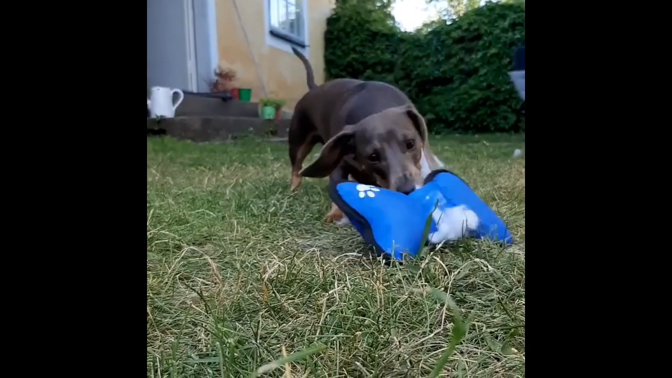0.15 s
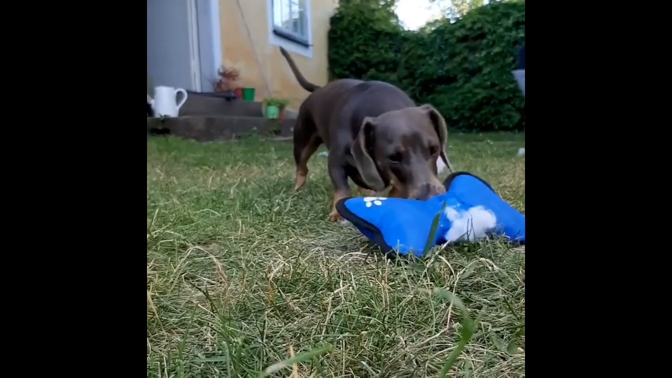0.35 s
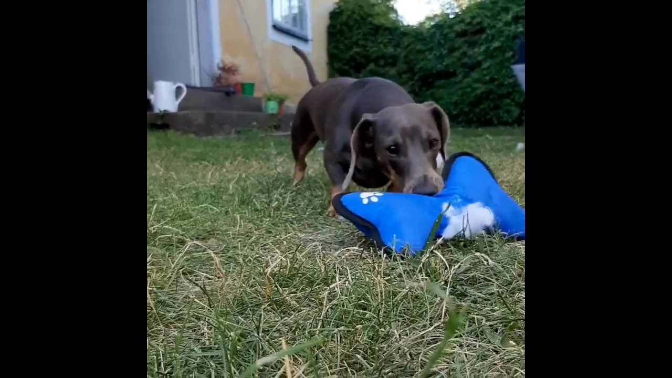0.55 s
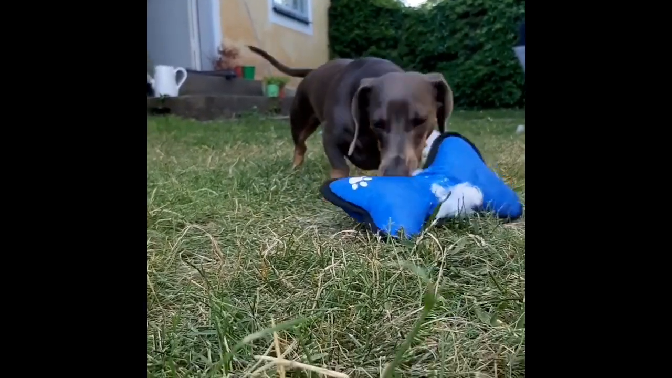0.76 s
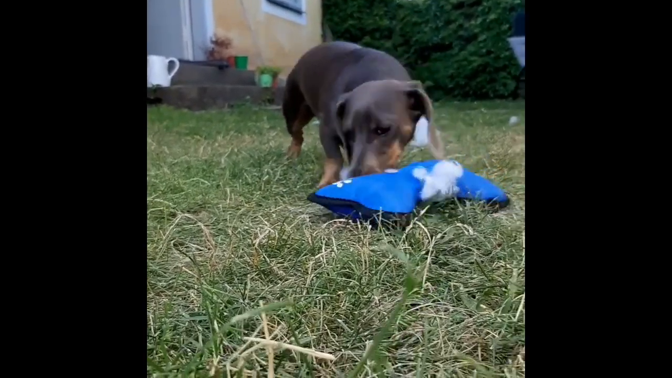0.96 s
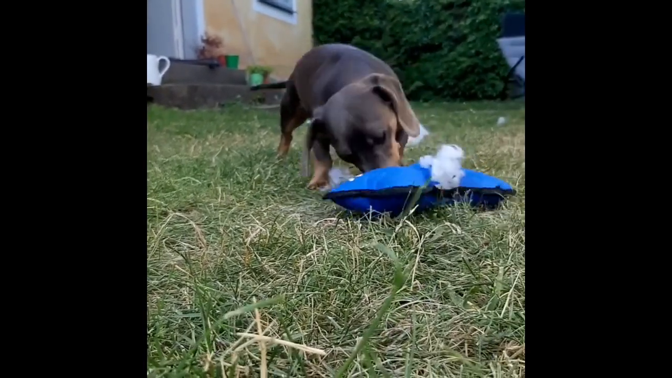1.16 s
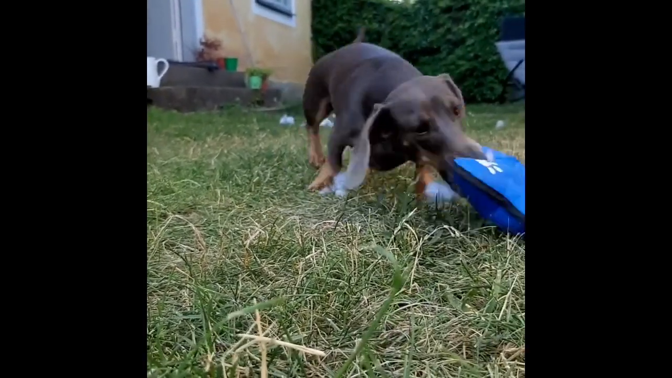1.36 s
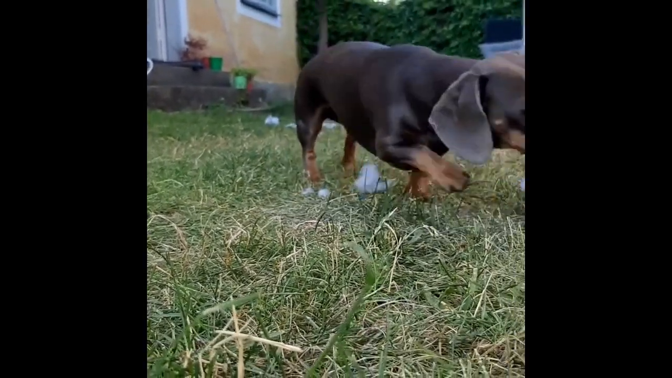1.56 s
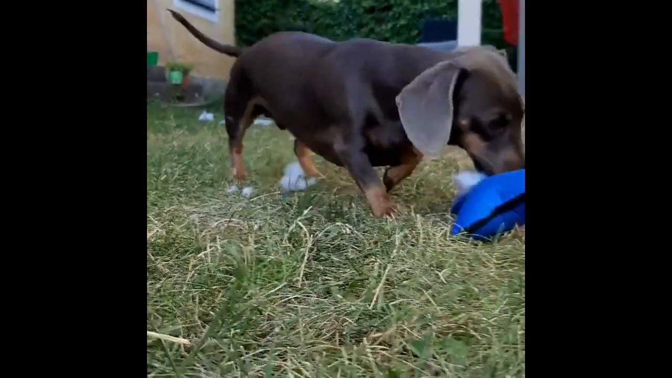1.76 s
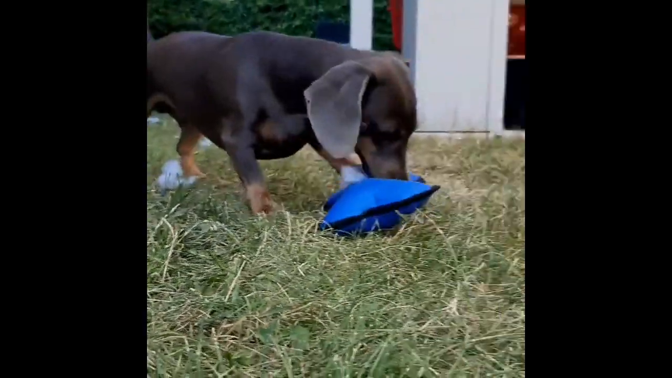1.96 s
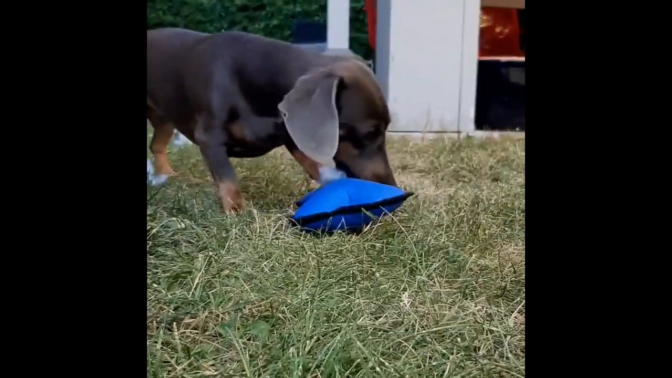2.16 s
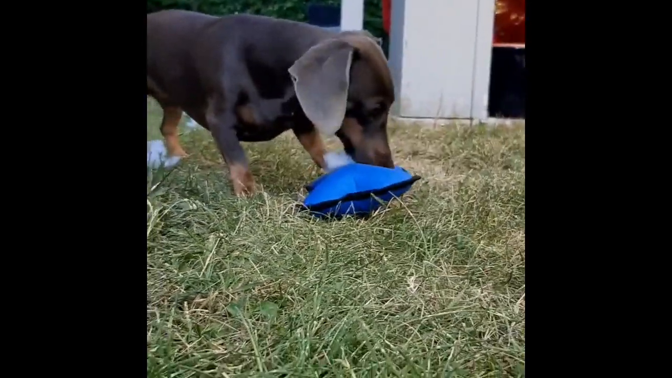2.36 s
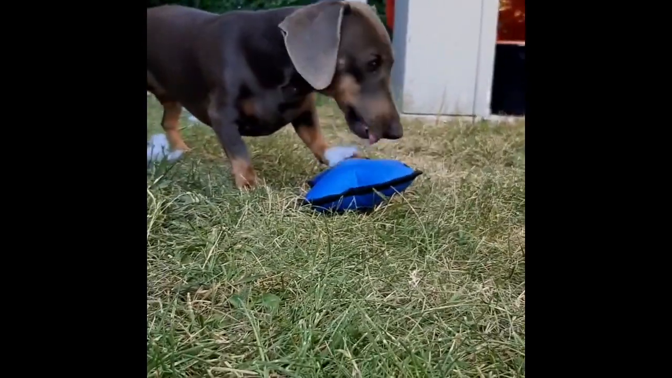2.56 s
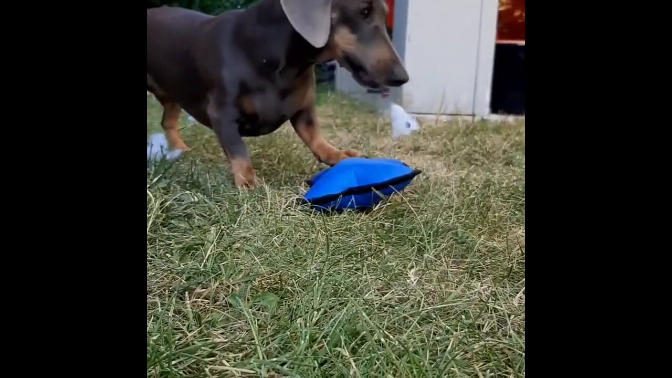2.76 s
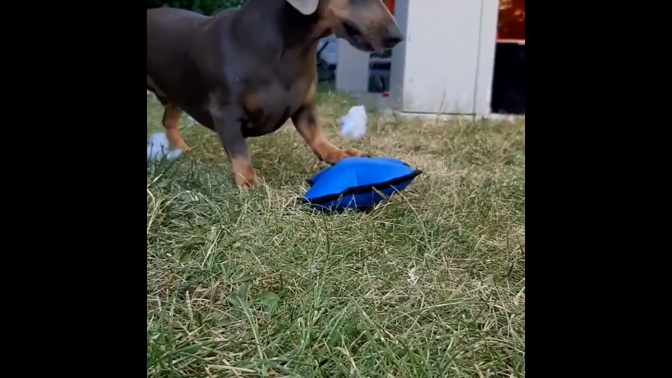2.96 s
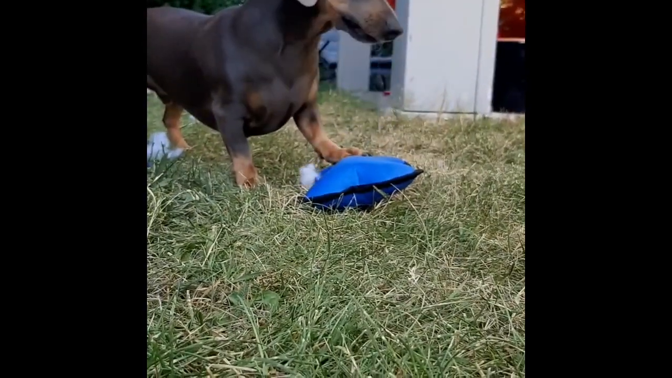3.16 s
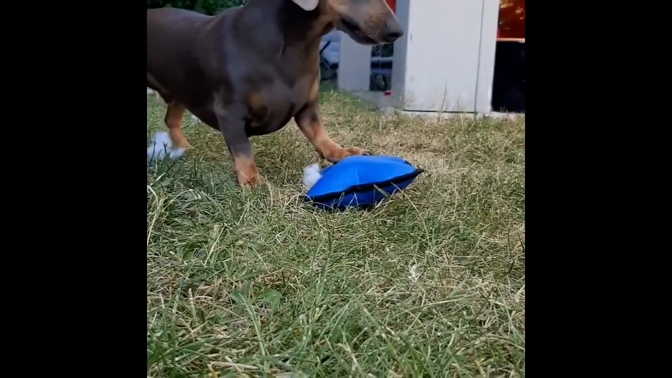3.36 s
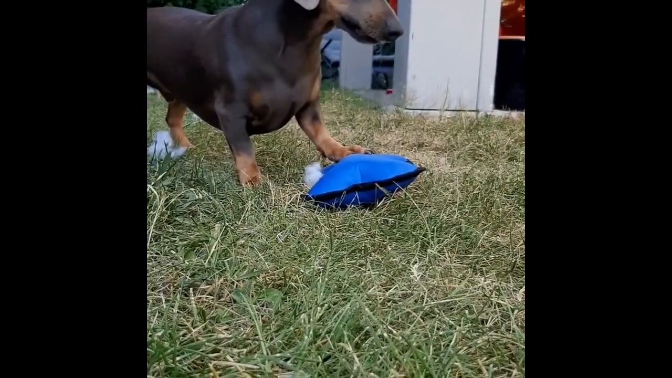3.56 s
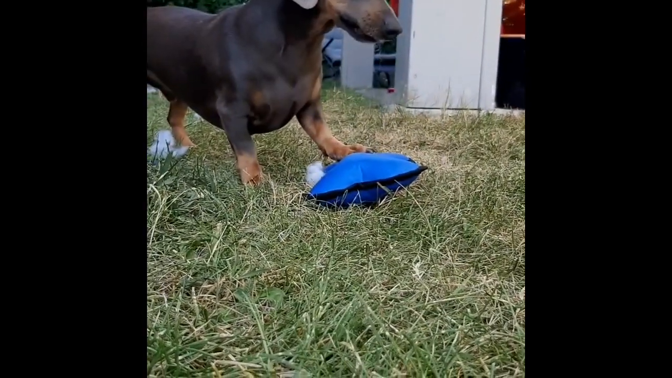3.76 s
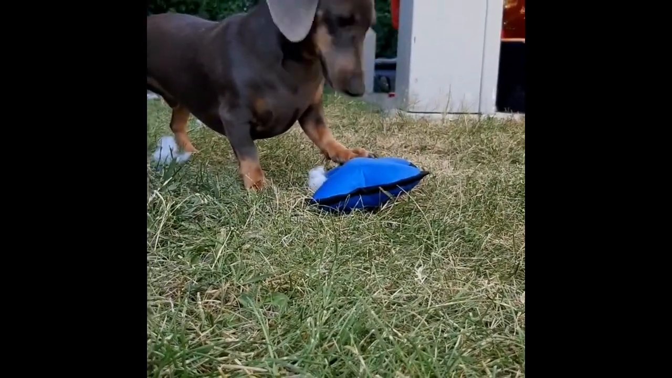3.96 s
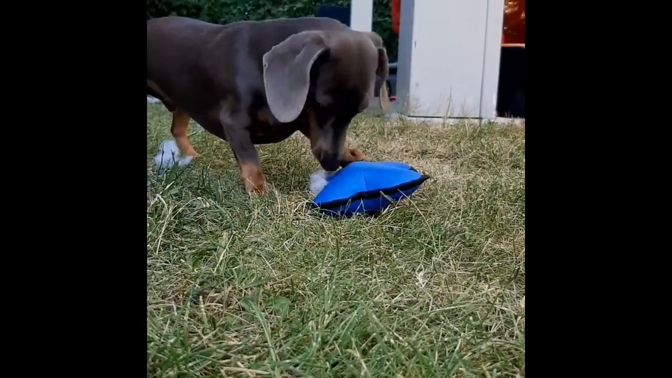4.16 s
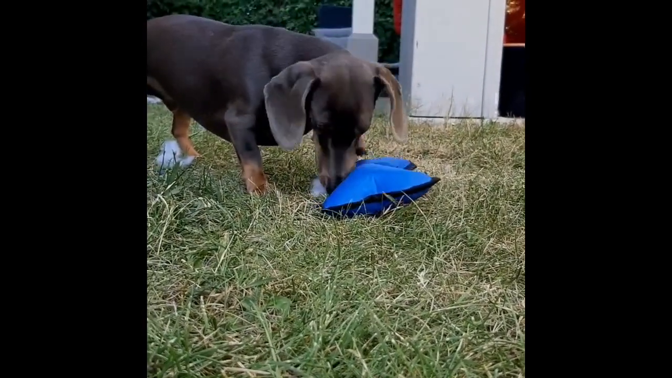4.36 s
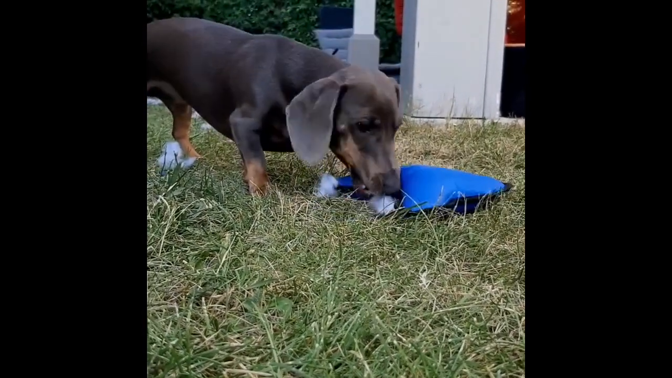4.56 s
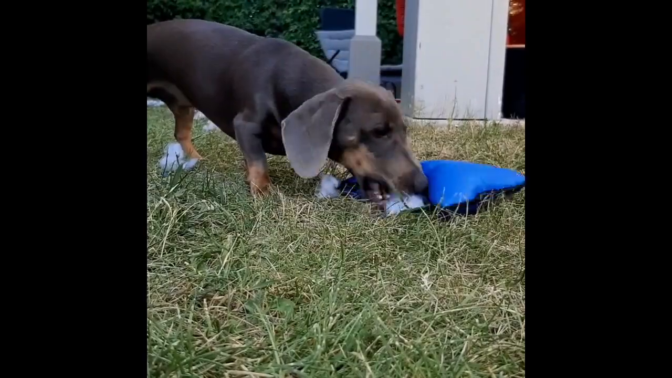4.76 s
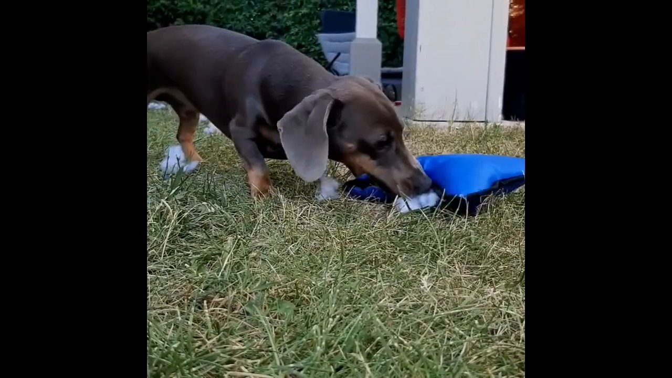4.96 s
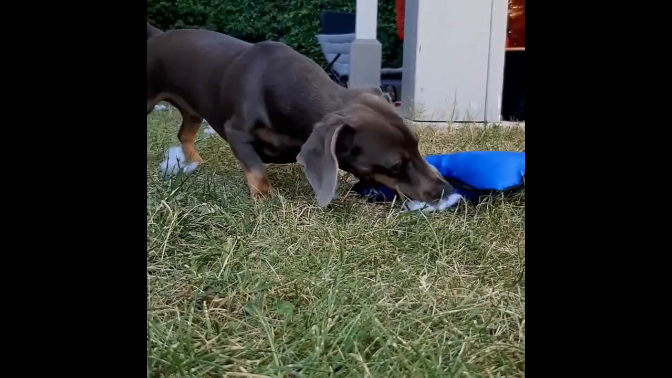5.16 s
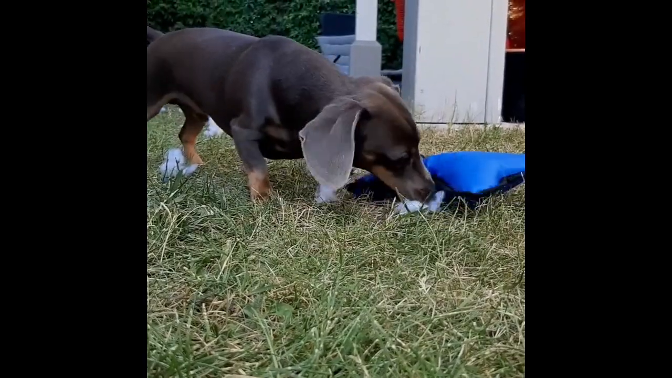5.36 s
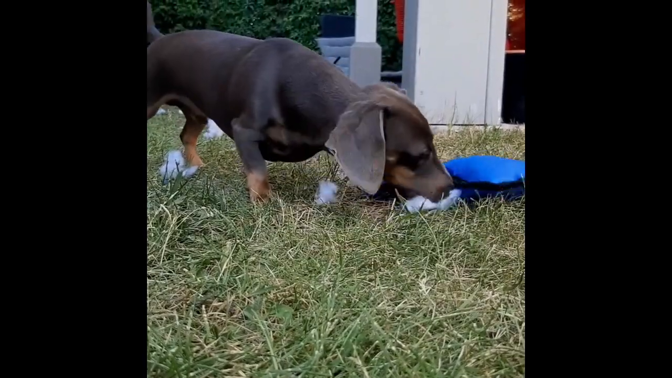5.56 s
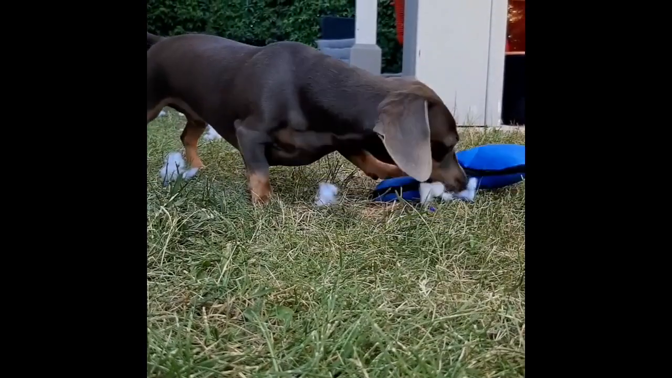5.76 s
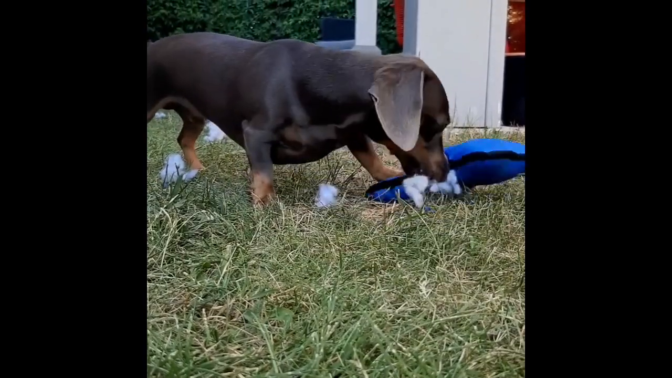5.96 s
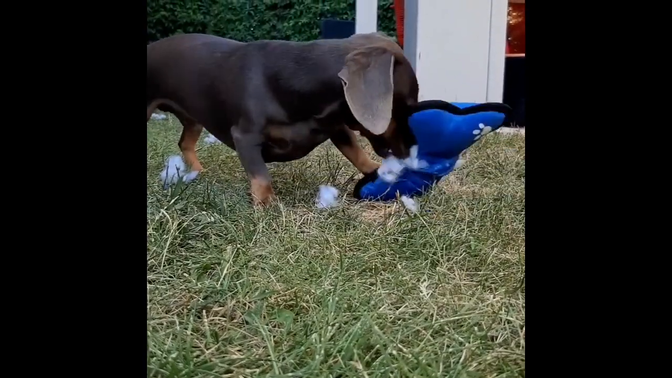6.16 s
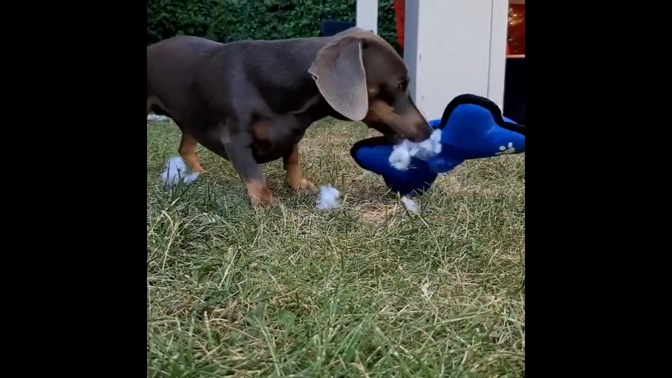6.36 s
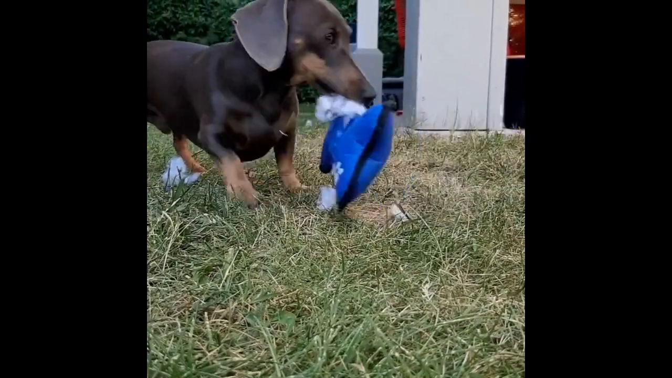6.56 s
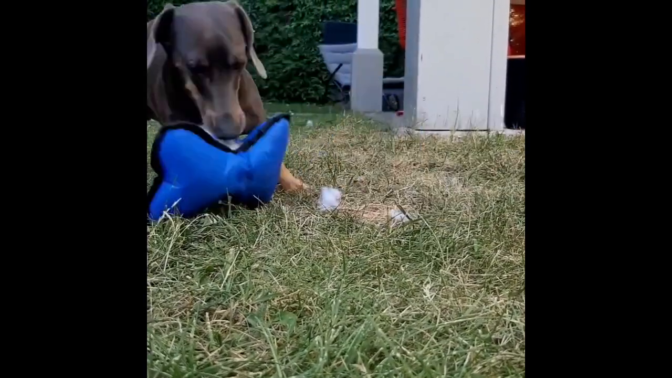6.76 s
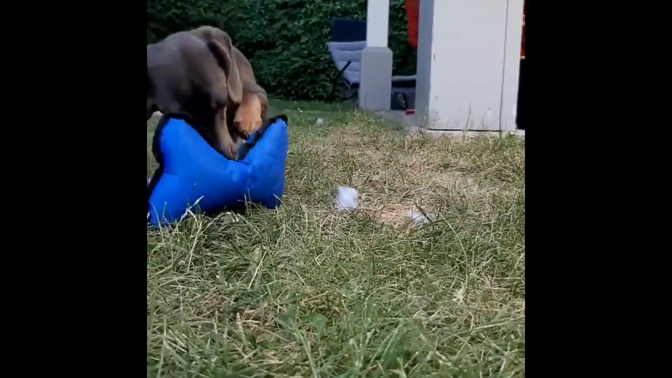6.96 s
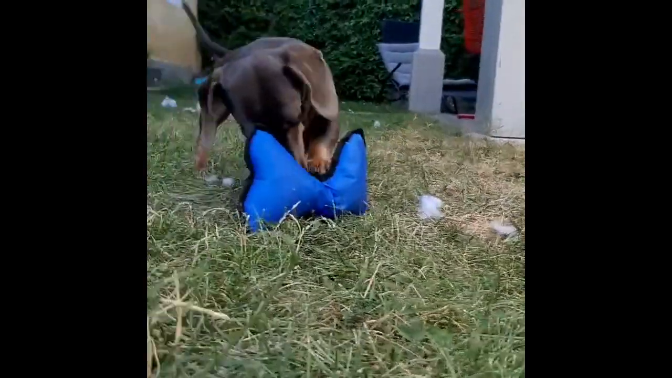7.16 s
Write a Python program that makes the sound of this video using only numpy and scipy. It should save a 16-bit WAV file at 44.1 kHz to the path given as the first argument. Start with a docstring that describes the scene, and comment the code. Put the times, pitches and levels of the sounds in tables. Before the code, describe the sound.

Stiff dry grass drags across the right microphone port, very close and bright, with crackling scrapes, sharp ticks and a few popping thumps. It is busiest for the first two and a half seconds, then nearly stops. A brief scrape returns at four seconds. Behind, faint in both ports, a small dog tugs a fabric toy with rustles, huffs and a dull knock, then a quick swish before the grass bursts back at the end.

```python
"""Stiff grass blades drag, tick and thump across the right one of two microphone ports held down in dry grass.
The drag is noise and tiny slips ringing many blades; ticks are short noise bursts; thumps are pushes of air.
Behind it, faint in both ports, a puppy worries a stuffed fabric toy: shaped noise makes its rustle and huffs,
and fading low tones make the falls of paws and toy. A quiet garden rumble of low noise lies under it all."""
import sys
import numpy as np
from scipy import signal
from scipy.fft import rfft, irfft, next_fast_len
from scipy.io import wavfile
from scipy.ndimage import uniform_filter1d

SR = 44100
rng = np.random.default_rng(int(sys.argv[2]) if len(sys.argv) > 2 else 0)


def generate_wav(sig):
    """Save sig (samples, or channels by samples) to the path in sys.argv[1] as 16-bit PCM at SR."""
    pcm = np.round(np.clip(np.atleast_2d(sig).T, -1, 1) * 32767).astype(np.int16)
    wavfile.write(sys.argv[1], SR, pcm)


N = 317961   # length in samples

# stalks pressed flat on the port: start_s, first_swing (about full scale 1, sign gives direction),
# push_ms (length of the push), step_db (lasting pressure drop)
THUMPS = [(.8730, 0.54, 0.21, -25), (0.914, -0.09, 0.38, -59), (1.617, 0.14, 0.49, -39),
          (1.7890, -0.17, 0.57, -37), (1.7992, 0.27, 0.21, -5.5), (2.3744, 0.81, 0.052, -15.5),
          (6.956, -0.11, 0.85, -49.5), (6.9949, 0.27, 0.26, -39), (7.021, 0.22, 1.08, -31),
          (7.0314, -0.45, 0.97, -43), (7.100, -0.19, 1.36, -24), (7.104, -0.071, 2.3, -43),
          (7.157, -0.17, 0.59, -24), (7.171, -0.16, 1.45, -26), (7.193, -0.049, 2, -49)]
CUTOFF_HZ = 13600   # top of the sound


def from_db(db):
    """Gain of a level in dB."""
    return 10 ** (np.asarray(db) / 20)


def rms_one(x):
    """Scale to an average (rms) level of 1."""
    return x / np.sqrt(np.mean(x ** 2) + 1e-20)


def in_time(rows):
    """Join the rows of a table with straight lines: one value a sample for each column after the time."""
    s, *columns = np.transpose(rows)
    return [np.interp(np.arange(N) / SR, s, column) for column in columns]


def smooth(x):
    """Turn a control known at every 32nd sample into one value a sample."""
    return np.interp(np.arange(N) / 32, np.arange(len(x)), x)


def drift(rate):
    """Slow random wander that turns about rate times a second; spread 1."""
    r = np.exp(-2 * np.pi * rate / SR)
    noise = rng.standard_normal(N + SR)
    return rms_one(signal.lfilter([1], [1, -2 * r, r * r], noise)[SR:])   # drop the first second: settling


def colour(x, points):
    """Shape a spectrum by (pitch, level) points, falling 13 dB an octave more outside them; rms 1."""
    size = next_fast_len(N)
    octave = np.log2(np.maximum(np.arange(size // 2 + 1) * SR / size, 1))
    pitch_hz, level_db = np.transpose(points)
    at = np.log2(pitch_hz)
    outside = np.maximum(at[0] - octave, 0) + np.maximum(octave - at[-1], 0)
    gain = from_db(np.interp(octave, at, level_db) - 13.0 * outside)
    return rms_one(irfft(rfft(x, size) * gain, size)[..., :N])


def add(out, s, sound):
    """Mix a short sound in at time s."""
    i = round(s * SR)
    out[i:i + len(sound)] += sound[:N - i]


def swells(s, level_db, rise, fall):
    """Power of each event: it climbs and drops 20 dB in its rise and fall, and ever faster beyond."""
    late = np.arange(0, N + 32, 32) / SR - s[:, None]   # seconds after the loudest moment
    away = np.where(late < 0, -late / rise[:, None], late / fall[:, None])
    drop_db = 20 * np.maximum(away, away ** 2)
    return from_db(2 * (level_db[:, None] - drop_db))   # doubled dB gives power


def two_ports(make, points, alike):
    """A source partly common to both ports (the right one hears it round the handset), partly scattered."""
    round_body_hz = 1200   # the path round the handset turns the phase by a quarter cycle here
    common, left, right = make(), make(), make()
    turn = np.tan(np.pi / 4 - np.pi * round_body_hz / SR)
    later = signal.lfilter([-turn, 1], [1, -turn], common)   # all-pass: turns phase, keeps level
    shared = np.sqrt(alike) * np.array([common, later])
    scattered = np.sqrt(1 - alike) * np.array([left, right])
    return colour(shared + scattered, points)


def garden_rumble():
    """Steady low noise, a little stronger in the right port."""
    # colour of the rumble: pitch_hz, level_db (relative)
    rumble_colour = [(25, -12.5), (60, 5.5), (130, 0.5), (190, 1.5), (300, -19.5)]
    rumble = two_ports(lambda: rng.standard_normal(N), rumble_colour, alike=0.31)
    return from_db(-82) * rumble * from_db([[0], [2.5]])


def lumpy_noise():
    """Noise of uneven strength, for cloth, grass and breath."""
    return from_db(0.52 * drift(43)) * rng.standard_normal(N)


def rustle_and_huffs():
    """The dog's tugs and steps swell a bright rustle of cloth and grass and lower breathy huffs."""
    # tugs and steps: loudest_s, rustle_db, rise_s and fall_s (times for 20 dB),
    # huff_db (huffing and shuffling over the rustle, in the left port)
    tugs = [(.17, -58, 0.28, 0.14, -11.5), (.58, -67, 0.32, 0.18, -2), (.75, -55.5, .1, 0.13, -7),
            (.97, -65.5, 0.23, .2, -2), (1.17, -66, .2, 0.34, -14), (1.39, -57, 0.17, 0.16, -9.5),
            (1.59, -65.5, 0.16, 0.17, -1), (1.77, -58, 0.21, 0.067, -4), (1.87, -63, 0.082, .2, -6),
            (1.99, -61.5, .1, .15, -5), (2.2, -65, 0.14, 0.23, 13.5), (2.3, -63.5, .2, 0.2, 7),
            (4.02, -69, .2, .25, 2), (4.21, -72, .2, .3, -1.5), (4.5, -55, .09, 0.11, -8),
            (4.77, -60.5, 0.15, 0.12, -5.5), (5.12, -67, 0.4, 0.17, -1), (5.3, -65, 0.08, 0.14, -3),
            (5.51, -61.5, 0.13, 0.07, -9.5), (5.69, -62.5, .25, 0.091, -11), (5.9, -66, 0.4, 0.15, -9),
            (6.045, -58.5, 0.032, 0.093, 0), (6.29, -64.5, 0.072, 0.14, -5), (6.45, -68, 0.072, 1, -4),
            (6.7, -42.5, .03, 0.074, -7.5), (6.8, -66, 0.12, 0.38, 1), (7.13, -60.5, 0.27, 0.24, -12)]
    # colour of the rustle: pitch_hz, level_db (relative)
    rustle_colour = [(700, -24), (1300, 0.5), (2600, -0.5), (5000, -1.5), (7900, -2.5), (8800, -26.5),
                     (9800, -9.5), (12000, -0.5), (13100, -11.5)]
    # colour of the huffs: pitch_hz, level_db (relative)
    huff_colour = [(120, -8), (220, -8.5), (310, -2.5), (400, -5), (800, -5.5), (1300, -14)]
    still_rustle_db, still_huff_db = -83, -85   # left while the dog stands still
    s, level_db, rise, fall, huff_db = np.transpose(tugs)
    power = swells(s, level_db, rise, fall)
    rustle = np.sqrt(smooth(power.sum(0)) + from_db(2 * still_rustle_db))
    huff = np.sqrt(smooth(from_db(2 * huff_db) @ power) + from_db(2 * still_huff_db))
    out = rustle * two_ports(lumpy_noise, rustle_colour, alike=0.47)
    return out + huff * two_ports(lumpy_noise, huff_colour, alike=0.99) * from_db([[0], [3]])


def paw_and_toy_falls():
    """Each dull fall is a tone that fades within six cycles, 3 dB stronger in the right port."""
    # falls: start_s, level_db (left port, before the fade), pitch_hz
    fall_rows = [(4.455, -43, 477), (5.392, -58, 75), (5.51, -56, 900), (6.0329, -29.5, 504),
                 (6.0356, -50, 2420), (6.042, -46, 149), (6.291, -51, 505), (6.712, -42, 141)]
    falls = np.zeros(N)
    for s, level_db, hz in fall_rows:
        turns = np.arange(round(6 * SR / hz)) * hz / SR   # time in cycles
        add(falls, s, from_db(level_db) * np.sin(2 * np.pi * turns) * np.exp(-1.5 * turns))
    return falls * from_db([[0], [3]])


def sweep():
    """The toy is swept through the grass: one quick swish of grainy noise, swelling and stopping short."""
    # the swish: start_s, loudest_s, end_s, level_db (at its loudest)
    swish = (6.652, 6.696, 6.728, -37.5)
    # colour of the swish: pitch_hz, level_db (relative)
    swish_colour = [(900, -14), (2300, -2), (4200, 0), (7800, -7), (8800, -22), (10500, -10), (13000, -12)]
    start, top, end, level_db = swish
    ramp = np.interp(np.arange(N) / SR, [start, top, end], [0, 1, 0])
    stroke = np.sin(np.pi / 2 * ramp) ** 1.5
    grain = from_db(1.8 * drift(130)) * rng.standard_normal(N)
    return from_db(level_db) * stroke * two_ports(lambda: grain, swish_colour, alike=1)


def contact():
    """Strokes of blades add to the resting contact; brightness is an average weighted by scrape power."""
    # strokes over the right port: loudest_s, scrape_db, rise_s and fall_s (times for 20 dB),
    # rub_db (dull rub over the scrape), bright_db (treble over middle)
    strokes = [(.025, -49.5, .11, 0.19, -8, 3), (.235, -43, .02, .12, -18, -7),
               (0.276, -40, .08, 0.052, -18, -1.5), (.395, -53, .03, .25, -27, -3.5),
               (.51, -35, 0.1, 0.29, -15, -1), (.575, -22.5, 0.1, 0.15, -10.5, -3),
               (.745, -28.5, 0.28, 0.39, -6, -11), (0.931, -30.5, 0.71, 0.17, -15, 2.5),
               (1.162, -33.5, 0.11, 0.16, -16.5, -2.5), (1.255, -39, 0.21, 0.059, -13.5, 1.5),
               (1.44, -39, 0.064, .11, -21, 0), (1.531, -31, 0.065, 0.51, -13, 4),
               (1.62, -26.5, 0.14, 0.051, -19, -5), (1.78, -26.5, 0.3, .08, -7.5, -5),
               (1.86, -27.5, 0.1, 0.34, -9, -5), (1.99, -26.5, 0.27, 0.1, -12, -5),
               (2.221, -28.5, 0.21, 0.27, -12.5, -3), (2.37, -34.5, 0.17, 0.17, -11.5, 7.5),
               (2.479, -40.5, 0.11, 0.02, -7, -3), (2.52, -33, 0.15, .03, -24, 2.5),
               (2.66, -47.5, .08, 0.12, -15.5, 7), (2.785, -49.5, 0.07, 0.036, -14, 7),
               (3.429, -51, .05, 0.068, -28, 7), (3.599, -54.5, .15, .06, -19, 5.5),
               (3.93, -32.5, .04, 0.13, -34, 6.5), (4.0, -22.5, 0.077, 0.075, -15.5, 0),
               (4.15, -53, 0.046, 0.27, -10, 3), (4.26, -46.5, 0.086, 0.15, -11.5, -2),
               (4.96, -44.5, 0.085, 0.25, -21, 11), (5.085, -37.5, 0.24, .06, -17, -0.5),
               (5.18, -45, .15, 0.031, -13, 7), (5.245, -49.5, .03, 0.071, -5, 2.5),
               (5.387, -57.5, 0.073, .1, -1.5, 11.5), (5.996, -54.5, 0.036, .06, -33, 10),
               (6.44, -62.5, .1, 0.24, -16, 14), (6.66, -42.5, 0.0082, 0.14, -12, 3.5),
               (6.81, -50, .04, .1, -12, 8), (6.88, -29, 0.037, 0.22, -12, 0),
               (6.929, -23.5, 0.088, 0.17, -14.5, -4), (7.023, -30, 0.16, .03, 3.5, 7),
               (7.104, -30.5, 0.022, .035, 0, 2), (7.165, -22.5, 0.02, .03, -5, -3),
               (7.21, -28, 0.036, .04, -14, -1.5)]
    # blades resting on the port never lie quite still: time_s, scrape_db, rub_db, bright_db
    rest = [(0, -65.5, -58.5, -6.5), (.34, -64.5, -67.5, -5.5), (1.36, -65, -63, -8),
            (2.55, -61, -58.5, 3.5), (2.85, -64.5, -86, 6), (3.65, -64, -92, 6), (3.78, -60.5, -72, -2.5),
            (4.4, -63, -68, 16.5), (4.75, -73, -68.5, -4.5), (5.35, -62, -63, -3), (5.6, -64.5, -68.5, -12),
            (6.1, -65.5, -75, -3), (6.5, -67, -69.5, -2.5), (6.63, -79.5, -82, -1.5),
            (6.76, -75, -62.5, -1), (7.21, -49.5, -37.5, -7)]
    s, level_db, rise, fall, rub_db, bright_db = np.transpose(strokes)
    rest_db, rest_rub_db, rest_bright_db = in_time(rest)
    power = swells(s, level_db, rise, fall)
    rest_power = from_db(2 * rest_db)
    scrape = smooth(power.sum(0)) + rest_power
    rub = smooth(from_db(2 * rub_db) @ power) + from_db(2 * rest_rub_db)
    bright = (smooth(bright_db @ power) + rest_bright_db * rest_power) / scrape
    return 10 * np.log10(scrape), 10 * np.log10(rub), bright


def crackle(per_s, bright_db, spread_db, cycles, hiss_db, clump_db, patchy_db):
    """Clumped slips of uneven size and fine friction hiss ring blades of ten pitches, a few cycles each."""
    clumps = from_db(clump_db * (.6 * drift(20) + drift(92)))
    sizes = from_db(spread_db * np.minimum(rng.exponential(1, N), 3.6)) * rng.choice([-1, 1], N)
    happens = rng.random(N) < per_s * clumps / SR
    slips = rms_one(sizes * happens / np.sqrt(per_s))   # evens out the power of rare and frequent slips
    dealt = rng.integers(0, 10, N)   # which blade each slip rings
    out = np.zeros(N)
    for k, hz in enumerate(np.geomspace(900, 12500, 10)):
        hiss = from_db(hiss_db) * np.sqrt(clumps) * rng.standard_normal(N)
        push = slips * (dealt == k) + hiss
        r = from_db(-60 * hz / (cycles * SR))   # the ringing fades 60 dB in this many cycles
        w = 2 * np.pi * hz / SR
        blade = rms_one(signal.lfilter([1, -1], [1, -2 * r * np.cos(w), r * r], push))
        tilt_db = bright_db * np.log2(hz / 5000) / 2.37
        wander_db = patchy_db * drift(32)   # contact wanders from blade to blade
        out += np.sqrt(hz) * blade * from_db(tilt_db + wander_db)
    return out


def drag():
    """Bright scrape of the blade edges and a duller, lumpy rub of the stems; a harder drag slips more often."""
    # colour of the scrape: pitch_hz, level_db (relative)
    scrape_colour = [(600, -47), (1100, -15), (2000, -4), (3600, -2.5), (7800, -3), (8900, -11.5),
                     (10500, -3.5), (11900, 1), (13300, -7)]
    # colour of the rub: pitch_hz, level_db (relative)
    rub_colour = [(60, -7), (150, -5.5), (300, -2), (800, 1), (1200, 1), (2200, -2.5)]
    scrape_db, rub_db, bright_db = contact()
    per_s = 900 * from_db(0.37 * (scrape_db + 38.5))   # slips a second, before clumping
    blades = crackle(per_s, bright_db, spread_db=0.5, cycles=6.5, hiss_db=-11.0, clump_db=1.5, patchy_db=3.0)
    rub = colour(from_db(3.32 * drift(52)) * rng.standard_normal(N), rub_colour)
    skips_db = 1.5 * drift(43)   # the contact skips and catches
    scrape = from_db(scrape_db + skips_db) * colour(blades, scrape_colour)
    return scrape + from_db(rub_db) * rub


def unsealed():
    """While a stalk seals the port it shuts the scrape out, the more so the bigger its pressure step."""
    shut_db, t = np.zeros(N), np.arange(round(.03 * SR)) / SR
    for s, swing, ms, step_db in THUMPS:
        depth_db = 0.18 * max(step_db + 30, 0)
        add(shut_db, s + 0.00033, depth_db * np.exp(-(t / 0.011) ** 4))
    return from_db(-shut_db)


def stray_ticks():
    """Smaller snaps come by chance, stronger when the contact of the moment is stronger."""
    per_s, mean_ms, low_hz, high_hz = 38, 3.2, 4500, 10500
    margin_db, spread_db = 12, 3.5   # margin over a resting scrape of -72 dB; uneven strength
    fade = 0.17   # dB of that margin lost per dB of louder scrape
    when, size, pitch, length = rng.random((500, 4)).T
    s = .01 + np.cumsum(-np.log(1 - when)) / per_s   # random gaps between snaps
    scrape_db = contact()[0][np.minimum(s * SR, N - 1).astype(int)]
    chance_db = -spread_db * (1 + np.log(1 - size))
    level_db = scrape_db + margin_db - fade * (scrape_db + 72) + chance_db
    hz = low_hz + pitch * (high_hz - low_hz)
    rows = zip(s, level_db, hz, mean_ms * (.5 + length))
    return [row for row in rows if row[0] < N / SR]


def ticks():
    """Each blade splinters up to one sharp snap and dies away, in a broad band of its own."""
    # single blades snapping past the port: snap_s, level_db (at the snap, before the extra ring),
    # centre_hz, length_ms (sets how slowly the splinters build and fade)
    tick_rows = [(0.0215, -32.5, 8000, 0.36), (0.0364, -30.5, 7100, 0.62), (0.0442, -31.0, 9730, 1.0),
                 (0.1535, -27.5, 9400, 1.2), (0.1726, -45, 7800, 1.6), (0.222, -35, 7660, 1.4),
                 (0.304, -28, 4500, 1), (0.3633, -24.5, 5300, 1.4), (0.4526, -17, 8000, 1.4),
                 (0.5563, -8, 6940, 0.9), (0.5976, -11, 3900, 1.5), (0.717, -14.5, 2280, 0.9),
                 (0.9415, -16, 6500, 1.0), (0.9957, -10, 9200, 1.2), (1.0234, -16, 8400, 0.89),
                 (1.0361, -20.5, 9300, 1.1), (1.0703, -14.5, 6640, 2.5), (1.2611, -27, 7440, 0.46),
                 (1.4584, -19, 7940, 2.0), (1.5084, -10, 5800, 1.8), (1.6204, -11, 5800, 5.1),
                 (1.6965, -9.5, 4170, 1.5), (1.7211, -13, 5270, 4.9), (1.8601, -11.0, 5400, 1.9),
                 (1.935, -8.5, 3750, 0.89), (1.9897, -21, 6860, 6.5), (2.0397, -17.5, 2300, 0.91),
                 (2.2574, -13, 5240, 1.4), (2.4291, -19.5, 7500, 1.4), (2.4839, -17, 4230, 4.8),
                 (2.506, -26, 6300, 2), (2.5252, -16.5, 9200, 2.5), (2.5742, -15, 8400, 1.5),
                 (2.5858, -20, 5100, 1.7), (2.6351, -28, 4900, 1.2), (2.6581, -22, 7260, 0.82),
                 (2.6672, -24, 6700, 0.86), (2.6997, -22.5, 4230, 1.1), (2.7249, -30, 9400, 0.99),
                 (2.7812, -21.5, 8000, 1.1), (2.7983, -30, 9040, 3.0), (2.93, -35, 6900, 3.8),
                 (3.1664, -42.0, 8200, 1.9), (3.2885, -43, 7100, 3), (3.3264, -45, 6850, 2.3),
                 (3.3687, -44, 9050, 2), (3.469, -31, 10300, 0.8), (3.4868, -26, 7400, 2.5),
                 (3.5503, -32, 7900, 3), (3.5891, -27.5, 8700, 0.67), (3.6287, -24, 10040, 1.9),
                 (3.6933, -31.0, 10100, 1.2), (3.709, -19.0, 8500, 1.6), (3.793, -32.5, 7540, 0.51),
                 (3.9494, -16, 5340, 1.5), (4.0934, -23, 7800, 0.97), (4.1055, -29, 8400, 0.95),
                 (4.166, -39, 4950, 1.4), (4.2266, -23, 5000, 1.9), (4.2605, -21.5, 9800, 1.5),
                 (4.2714, -27, 6700, 1.2), (4.3572, -34, 4500, 0.8), (4.3638, -35, 10000, 1.5),
                 (4.4302, -35, 9100, 1.2), (4.5835, -32.5, 10600, 1.6), (4.6715, -41.5, 7100, 3.5),
                 (4.7441, -34.5, 7700, 2.3), (4.9204, -23.5, 8900, 0.67), (4.9269, -27.5, 6500, 1.5),
                 (5.0314, -23, 7700, 3.1), (5.074, -16.5, 5960, 2.5), (5.1205, -24, 6400, 2.9),
                 (5.125, -24.5, 10700, 1.6), (5.1403, -21.5, 7160, 1.0), (5.2123, -25, 7600, 1.2),
                 (5.237, -14.5, 4370, 1.5), (5.2963, -39, 6800, 0.9), (5.371, -36, 9600, 0.6),
                 (5.3894, -28.5, 4170, 0.95), (5.6106, -38.5, 7900, 1.2), (5.6423, -41, 5900, 1.3),
                 (5.6589, -39, 6100, 1.5), (5.8482, -39.5, 11800, 1.3), (5.9757, -34.5, 11000, 1.4),
                 (5.9863, -35, 8300, 1.2), (6.0344, -35, 1480, 2.4), (6.3455, -43.5, 10100, 0.9),
                 (6.4426, -41, 8300, 0.9), (6.4512, -36, 7300, 1.5), (6.8221, -23, 7200, 1.8),
                 (6.8358, -22.5, 6700, 2.3), (6.851, -12.0, 6460, 0.62), (6.9557, -7, 4350, 0.57),
                 (6.9951, -13, 2800, 1.4), (7.0209, -10, 2530, 7.3), (7.0316, -13.5, 2500, 1.3),
                 (7.1032, -17, 5700, 8.1), (7.108, -11.5, 5700, 4.1), (7.1693, -4.0, 3750, 3.3)]
    top_hz, top_width_hz, top_db = 12700, 1300, 3.5   # a narrow lift near 12.7 kHz brightens the snaps
    out, ms_from_snap = np.zeros(N), np.arange(-220, 330) * 1000 / SR
    snaps = list(tick_rows) + stray_ticks()
    splinters = rng.standard_normal((len(snaps), len(ms_from_snap)))
    for (s, level_db, hz, ms), noise in zip(snaps, splinters):
        fade_ms = np.where(ms_from_snap < 0, 0.77 * ms, 0.55 * ms)
        burst = noise * np.exp(-np.abs(ms_from_snap) / fade_ms)
        burst += 8.8 * (ms_from_snap == 0)   # the snap itself
        band = signal.butter(2, [0.35 * hz, min(1.635 * hz, CUTOFF_HZ)], "band", fs=SR, output="sos")
        burst = signal.sosfilt(band, burst)
        strongest = uniform_filter1d(burst ** 2, size=6).max() ** .5   # rms over six samples
        add(out, s + ms_from_snap[0] / 1000, from_db(level_db) * burst / strongest)
    top = signal.iirpeak(top_hz, top_hz / top_width_hz, fs=SR)
    return out + from_db(top_db) * signal.lfilter(*top, out + 1e-18)


def thumps():
    """A short in-and-out push of air, then a pressure drop that leaks away while the stalk seals the port."""
    out = np.zeros(N)
    leak = np.exp(-(np.arange(SR // 20) / (.009 * SR)) ** 2)   # the seal leaks away in about 9 ms
    for s, swing, ms, step_db in THUMPS:
        u = np.linspace(-3, 3, round(2.96 * ms * SR / 1000))   # time in half push lengths
        add(out, s - 1.5 * ms / 1000, swing * (.3 - 2 * u) * np.exp(-u ** 2))
        add(out, s, -from_db(step_db) * leak)
    return out


def scene():
    """The grass touches the right port only; the garden and the dog are in both."""
    both = garden_rumble() + rustle_and_huffs() + paw_and_toy_falls() + sweep()
    grass = drag() * unsealed() + ticks() + thumps()
    return both + grass * [[0], [1]]


def record(dry):
    """The port cavity rings a little; a steep low cut turns pressure steps into a short low wobble; the top is cut."""
    port_hz, port_width_hz, port_db = 1534, 68, -3   # cavity behind the port
    r, w = np.exp(-np.pi * port_width_hz / SR), 2 * np.pi * port_hz / SR
    feed = np.array([1, 0, -1]) * (1 - r * r) / 2
    cavity = signal.lfilter(feed, [1, -2 * r * np.cos(w), r * r], dry)
    low_cut = signal.butter(6, 47, "high", fs=SR, output="sos")   # below 47 Hz
    heard = signal.sosfilt(low_cut, dry + from_db(port_db) * cavity)
    top_cut = signal.cheby2(16, 40, CUTOFF_HZ, fs=SR, output="sos")
    return signal.sosfilt(top_cut, heard)


dry = scene()
out = record(dry)
generate_wav(out)
```